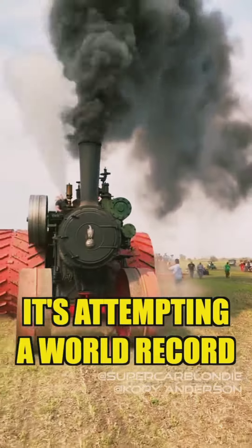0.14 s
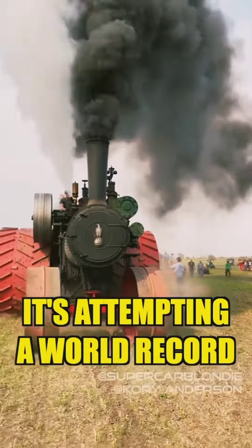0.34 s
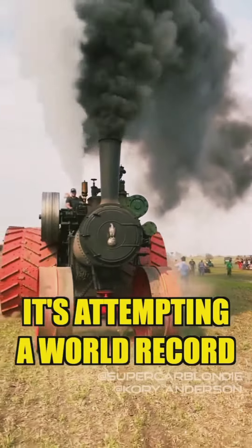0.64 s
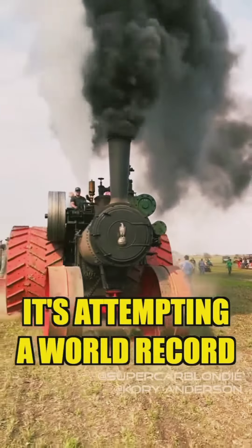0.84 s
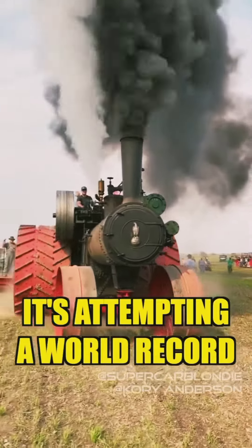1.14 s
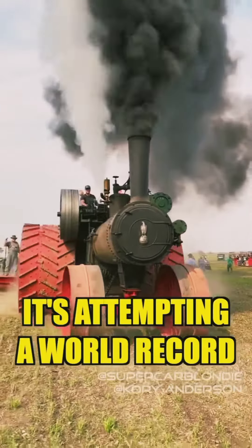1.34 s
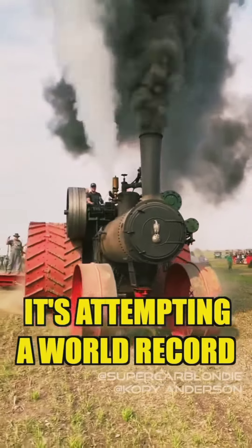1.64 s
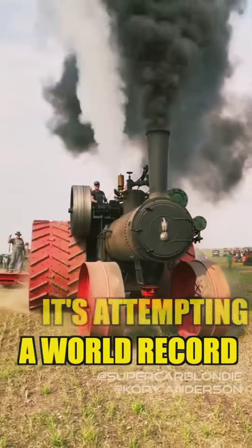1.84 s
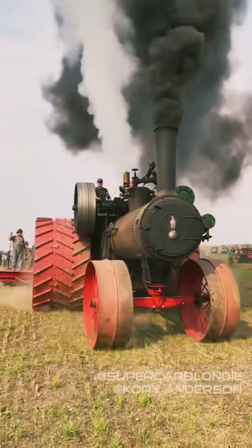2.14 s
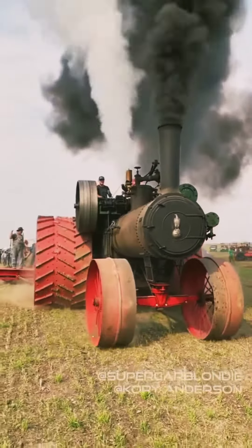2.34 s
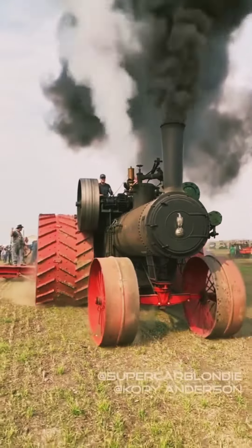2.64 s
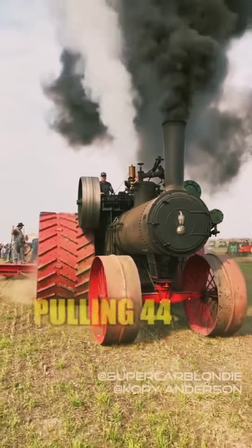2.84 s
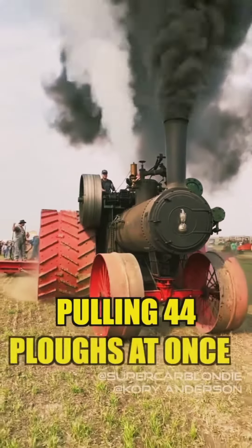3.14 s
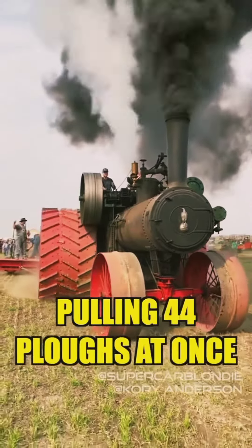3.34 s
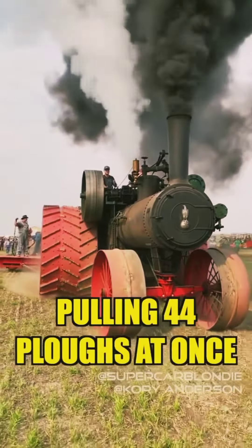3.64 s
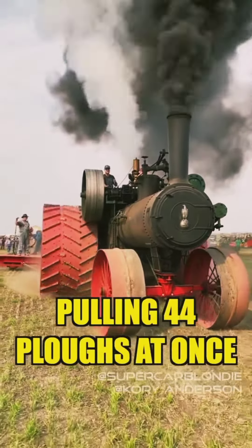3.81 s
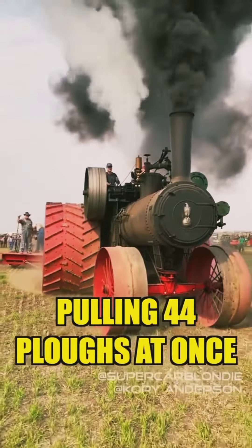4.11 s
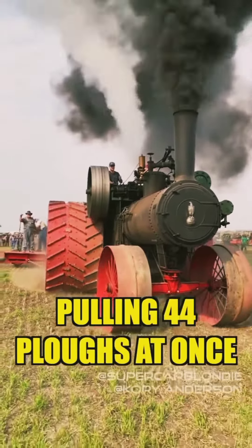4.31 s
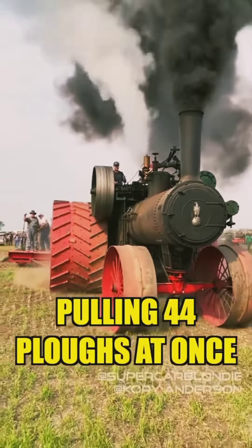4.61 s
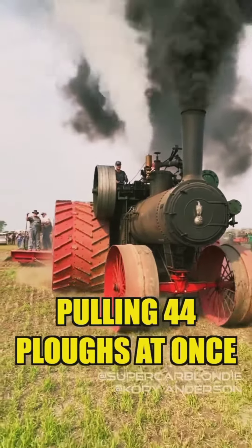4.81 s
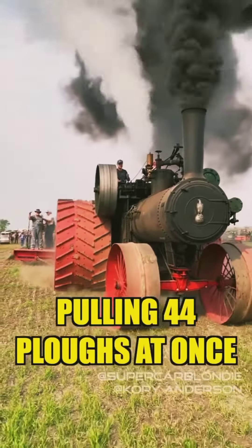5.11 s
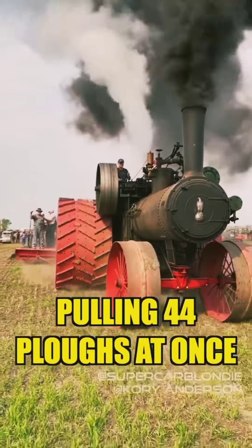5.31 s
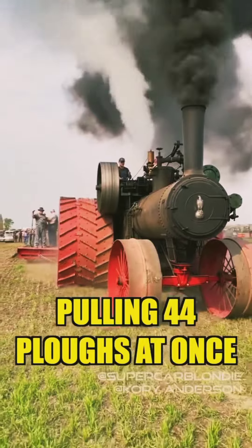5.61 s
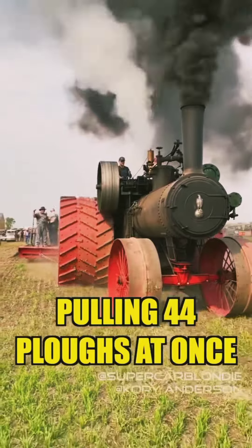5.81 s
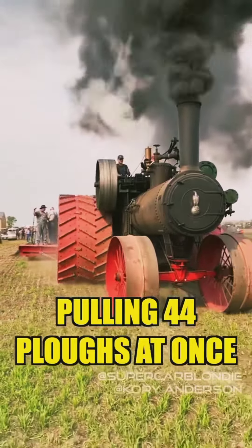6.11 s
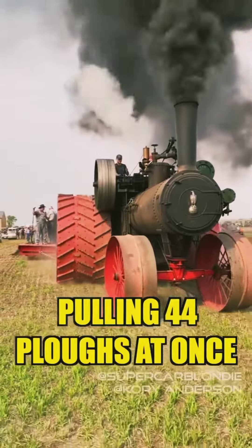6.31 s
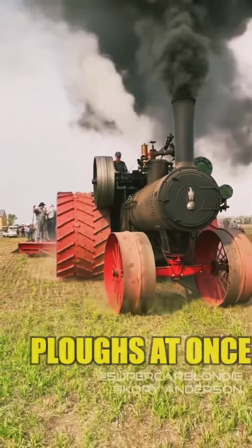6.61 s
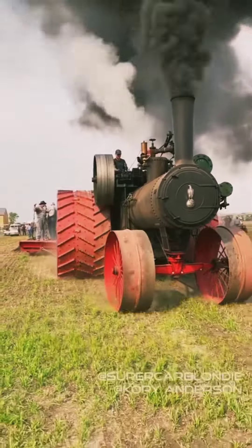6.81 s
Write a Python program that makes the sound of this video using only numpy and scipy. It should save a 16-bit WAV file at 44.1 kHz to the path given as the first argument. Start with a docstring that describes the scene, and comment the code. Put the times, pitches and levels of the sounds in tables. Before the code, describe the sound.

A steam engine's safety valve pops, blows off with a loud roaring hiss, then snaps shut, leaving a thin leak and rapid chuffs.

```python
"""A steam traction engine's safety valve pops and blows off for six seconds.
Its turbulent jet roars and hisses, wet steam sizzles at the seat, and a hollow wavers in the sound.
The valve snaps shut, leaving a thin bright leak. Exhaust puffs boom in the stack about six times
a second, faint under the blow-off, forward before and after. Engine and gusting air rumble below."""
import sys
import numpy as np
from scipy import signal
from scipy.io import wavfile
from scipy.ndimage import map_coordinates

SR = 44100
rng = np.random.default_rng(int(sys.argv[2]) if len(sys.argv) > 2 else 0)


def wav_record(signal):
    """Record a signal, one row per channel, as 16-bit PCM in the file named by sys.argv[1]."""
    frames = np.transpose(np.atleast_2d(signal))
    bounded = np.clip(frames, -1, 1)
    # unit amplitude maps onto the largest positive 16-bit level
    quanta = np.round(bounded * 32767).astype(np.int16)
    wavfile.write(sys.argv[1], SR, quanta)


N = 306495
TIME_S = np.arange(N) / SR

# Steam through the valve. Each row: time in seconds, level in dB over settled flow.
VALVE_FLOW = [(.2, 5.5), (.35, 7.5), (.5, 6), (.93, 6), (1.0, 3.5), (1.15, 3), (1.3, 3.5), (1.7, 2.5),
              (2.05, 0.4), (2.17, -.5), (2.5, -1.1), (2.75, 0), (3.1, 1.6), (3.6, 0.54), (4.05, 0.6),
              (4.45, -1), (4.8, 0.8), (5.45, -1), (5.65, 0), (5.9, 0.5), (6.0, -2.5)]
# Slugs of wet steam. Each row: crest in seconds, decay in seconds, extra level in dB.
STEAM_SPITS = [(0.199, 0.036, 10), (0.396, 0.018, 2.5), (0.411, 0.022, 5), (.527, 0.0088, 3),
               (.595, 0.014, -4.5), (.66, 0.016, 2.5), (0.918, 0.0075, -3), (.958, 0.012, -6),
               (1.95, .03, 3.5), (2.0, 0.14, 2.5)]
# Sizzle during blow-off. Each row: time in seconds, level offset in dB.
SIZZLE_OFFSET = [(.3, -3), (.45, 0), (.7, -0.5), (.76, -9), (.82, -2.5), (.89, -5), (1.0, -2), (6, -2)]
# Reflections off boiler, flywheel and wheels, coming and going as the engine rolls.
# Each row: delay in ms, relative gain, crest in seconds, half length in seconds.
JET_REFLECTIONS = [(1.23, -.13, 2.7, 4), (1.03, -.11, 2.9, 4), (1.93, .17, 2.26, 1), (1.74, .1, 4.35, 4),
                   (2.95, .14, 3.5, 3), (3.15, -.15, 2.5, 2.5)]
LEAK_REFLECTIONS = [(1.24, -.26, 6.6, 1), (1.11, .24, 6.1, 1), (1.93, .42, 6.11, .06),
                    (2.33, -.4, 6.21, .25), (3.06, -.42, 6.35, .35), (3.24, .3, 6.42, .22),
                    (3.72, .27, 6.3, .3), (1.67, -.3, 6.67, .3), (1.98, .36, 6.68, .2),
                    (2.82, -.48, 6.67, .08)]
# Stack air column. Each row: frequency in Hz, width in Hz, bark level in dB, thud level in dB.
STACK_MODES = [(169.7, 10.8, -3, -3), (79.3, 11.8, -18, -21), (136.8, 9.8, -11, -17),
               (230, 14.4, -24, -19.5), (270.6, 24, -9.5, -30), (371, 37, -15.5, -21),
               (422, 24.5, -18, -21), (590, 50, -24, -22)]
# How the exhaust carries. Each row: time in seconds, level in dB.
EXHAUST_LEVEL = [(.07, -3), (.195, -7.5), (.25, -57), (.53, -27.5), (.76, -44), (.88, -44), (2.3, -47),
                 (2.9, -45), (3.8, -48.5), (4.95, -44), (5.5, -55), (6.25, -43.5), (6.55, -47),
                 (6.6, -25.5), (6.66, -25), (6.8, -31.5), (6.95, -29)]
# Governed engine speed. Each row: time in seconds, beats per second.
BEAT_RATE = [(0, 5.82), (2.8, 5.88), (3.6, 5.82), (4.2, 5.97), (7, 6.01)]
# Stirred air. Each row: crest in seconds, half length in seconds, level in dB.
AIR_GUSTS = [(0.11, 0.13, -18), (0.47, 0.073, -22), (0.605, 0.062, -25.5), (0.757, 0.041, -26.5),
             (0.994, 0.19, -46.5), (6.95, 0.05, -51)]
# Moving hollow. Each row: time in seconds, centre in Hz, half width in Hz, nominal depth in dB.
HOLLOW_PATH = [(.21, 630, 199, -2), (.255, 696, 200, 13), (.31, 660, 180, -7.5), (.38, 600, 262, 19),
               (.44, 680, 169, 46), (.57, 710, 158, 45), (.63, 720, 160, 3), (.72, 666, 150, 2),
               (.77, 640, 120, 36), (.87, 660, 252, 50), (.95, 730, 208, 54), (1.02, 670, 214, 50),
               (1.11, 790, 270, 35), (1.22, 760, 235, 18), (1.29, 770, 233, 35), (1.35, 836, 179, 46),
               (1.44, 820, 228, 15), (1.65, 870, 219, 16), (1.78, 880, 160, 55), (1.87, 935, 150, 35),
               (1.93, 980, 119, 44), (2.1, 980, 103, 39), (2.2, 950, 121, 18), (2.4, 940, 130, 5),
               (3.9, 930, 118, 6), (4.04, 1010, 111, 31), (4.17, 930, 125, 3), (5.4, 950, 122, 5.5),
               (5.8, 960, 129, 2)]
# Noise spectra. Each row: frequency in Hz, relative density in dB.
ROAR_SPECTRUM = [(400, -20), (750, -54), (1000, -19), (1150, -6.5), (1300, -4), (1450, 0.5), (2000, 1),
                 (2800, -0.9), (3500, -1.5), (4500, -2.5), (5200, -11.5), (7000, -17), (13000, -62)]
HISS_SPECTRUM = [(1200, -70), (3000, -6), (4600, 0.5), (5250, 1), (6300, 1), (7700, 0.5), (8600, -16),
                 (10500, -62), (13000, -26)]
PLUME_SPECTRUM = [(90, -33), (200, -11.5), (330, -11.5), (450, -7), (560, 0.5), (680, -2.5), (800, 1.5),
                  (1150, 0), (1800, -20)]
SIZZLE_SPECTRUM = [(2500, -62), (6000, -26), (7800, -6.5), (8800, 0), (9800, 0.5), (10500, 1), (11300, 3.5),
                   (11900, 5.5), (12200, 3.5), (13000, -1.5)]
LEAK_SPECTRUM = [(100, -9), (300, -2.5), (600, -3.5), (1000, 3), (1400, 2.5), (2100, 0.5), (2800, 1),
                 (3600, -2), (4500, -1.5), (5500, -2.5), (7500, -1), (9800, 2), (11000, 5.5), (13000, -11)]
POP_SPECTRUM = [(60, -1), (130, -4), (280, 4.5), (400, -16), (700, -6), (1200, -4.5), (2200, -12),
                (5000, -19), (13000, -38)]
BARK_SPECTRUM = [(40, -20), (70, -11), (130, -1.5), (200, 4), (300, -7), (600, -11.5), (1100, -12.5),
                 (2000, -19), (4000, -27), (8000, -36.5), (13000, -41.5)]
PUFF_SPECTRUM = [(60, -18), (170, 7), (290, -23), (380, -6), (470, -2), (600, 5), (1000, -9), (2000, -25),
                 (8000, -39)]
RUMBLE_SPECTRUM = [(15, -36), (35, -13), (55, 1), (80, 4), (125, 0), (200, -8), (320, -18), (600, -14.5),
                   (1500, -61)]
# Stereo width; jet and leak are nearly mono in the lows and at 2-3 kHz, wide in the treble.
# Each row: frequency in Hz, side minus mid in dB.
JET_SPREAD = [(300, -62), (550, -12), (800, -6), (1200, 1.5), (1600, -18.5), (2000, -81), (2500, -58),
              (3400, -19), (4000, -5), (6000, -2), (9000, -2), (12000, -5)]
LEAK_SPREAD = [(400, -35), (950, -25), (1600, -48), (2900, -44), (4200, -3), (7000, -2), (10000, -10.5)]
ENGINE_SPREAD = [(50, -20), (170, -32), (400, -50), (900, -36), (1600, -55), (6000, 0.5)]
RUMBLE_SPREAD = [(40, -10), (120, -15), (300, 4.5), (700, -4), (1500, -16)]

POP_S, OPEN_S, SHUT_S = .183, .198, 6.005
SPIT_SPRAY_SHARE = .68  # share of a spit's dB in hiss and sizzle


def valve_jet(roar_db=-24, hiss_db=-30, plume_db=-36.5, closing_s=.39):
    """The jet hisses at the mouth, roars above, rushes in the plume; more flow is louder and brighter."""
    flow_db, = curves(VALVE_FLOW)
    spit_db = spits_db()
    roar = noise(ROAR_SPECTRUM, JET_SPREAD, flutter_db=.3, flutter_hz=10, flicker_db=4.5, band_hz=131.4)
    roar *= from_db(roar_db + 1.06 * flow_db + spit_db)
    hiss = noise(HISS_SPECTRUM, JET_SPREAD, flutter_db=.6, flutter_hz=20, flicker_db=7.5, band_hz=202.2)
    hiss *= from_db(hiss_db + 1.48 * flow_db + SPIT_SPRAY_SHARE * spit_db)
    closing_db = 3 * step(SHUT_S - closing_s, width_s=.1)  # valve sinks toward its seat
    plume = noise(PLUME_SPECTRUM, JET_SPREAD, flutter_db=.5, flutter_hz=16, flicker_db=3.5)
    plume *= from_db(plume_db + .25 * flow_db + closing_db)
    return valve_lift() * boiler_reflections(roar + hiss + plume, JET_REFLECTIONS)


def valve_lift():
    """The valve jumps open and snaps shut: 0 to 1."""
    return step(OPEN_S, width_s=.007) * (1 - step(SHUT_S, width_s=.022))


def spits_db(attack_s=.004):
    """Slugs of wet steam abruptly choke the valve or burst through it."""
    return sum(db * swell(crest_s, attack_s, decay_s) for crest_s, decay_s, db in STEAM_SPITS)


def valve_seat(simmer_db=-53, blowing_db=-21, seeping_db=-33.5, leak_db=-36.5):
    """Wet steam sizzles at the seat throughout; once shut, leak and sizzle grow as pressure rebuilds."""
    flow_db, = curves(VALVE_FLOW)
    offset_db, = curves(SIZZLE_OFFSET)
    shut, since_shut_s = step(SHUT_S, width_s=.031), TIME_S - SHUT_S
    blowing = valve_lift() * from_db(blowing_db + offset_db + .076 * flow_db
                                     + SPIT_SPRAY_SHARE * spits_db())
    seeping = shut * from_db(seeping_db + 3 * since_shut_s)
    sizzle = noise(SIZZLE_SPECTRUM, JET_SPREAD, flutter_db=.5, flutter_hz=60, flicker_db=7, band_hz=764)
    sizzle *= from_db(simmer_db) + blowing + seeping
    sizzle[1] *= from_db(-8 * shut)  # the small leak is a narrow source
    leak = noise(LEAK_SPECTRUM, LEAK_SPREAD, flutter_db=0, flutter_hz=27, flicker_db=7.5, band_hz=108.8)
    leak *= shut * from_db(leak_db + 5 * since_shut_s)
    return sizzle + boiler_reflections(leak, LEAK_REFLECTIONS)


def valve_pop(level_db=-12):
    """A dull burst as the valve jumps off its seat."""
    burst = noise(POP_SPECTRUM, ENGINE_SPREAD, flutter_db=2, flutter_hz=120, flicker_db=2)
    return from_db(level_db) * swell(POP_S, rise_s=.016, fall_s=.024) * burst


def exhaust(bark_db=-6.5, draught_db=-19, puff_db=-14.5):
    """Puffs ring the stack: a rough bark over the fire's draught, a round thud once the valve pops."""
    popped = step(OPEN_S, width_s=.02)
    boom = stack_boom(popped)
    beats = exhaust_beats()
    bark = noise(BARK_SPECTRUM, ENGINE_SPREAD, flutter_db=1, flutter_hz=22, flicker_db=3)
    bark *= np.hypot(beats * from_db(bark_db), from_db(draught_db))
    puff = noise(PUFF_SPECTRUM, ENGINE_SPREAD, flutter_db=.5, flutter_hz=40, flicker_db=4.5)
    puff *= beats * from_db(puff_db)
    return np.array([boom * beats, np.zeros(N)]) + bark * (1 - popped) + puff * popped


def stack_boom(popped, flutter_db=1.1):
    """Hot, uneven gas makes each air-column resonance wander in pitch and strength."""
    boom = np.zeros(N)
    for hz, width_hz, bark_db, thud_db in STACK_MODES:
        phase = 2 * np.pi * np.cumsum(hz + .5 * width_hz * drift(25.7)) / SR
        level_db = bark_db * (1 - popped) + thud_db * popped + flutter_db * drift(32)
        boom += np.sqrt(2) * np.sin(phase) * from_db(level_db)
    return boom


def exhaust_beats(first_s=.024, scatter_s=.0018, scatter_db=1.3, echo_s=.057, echo_db=-9):
    """Envelope of the cylinder releases, at even steps of the crank, each with one echo."""
    rate_hz, = curves(BEAT_RATE)
    carry_db, = curves(EXHAUST_LEVEL)
    strokes = np.cumsum(rate_hz) / SR
    beats = np.zeros(N)
    for beat_s in first_s + np.interp(np.arange(strokes[-1]), strokes, TIME_S):
        late_s, extra_db = rng.normal(0, [scatter_s, scatter_db])
        beats += from_db(extra_db) * swell(beat_s + late_s, rise_s=.026, fall_s=.028)
    echo = from_db(echo_db) * np.interp(TIME_S - echo_s, TIME_S, beats, left=0)
    return from_db(carry_db) * np.hypot(beats, echo)


def rumble(calm_db=-62, stirred_db=23.5, settle_s=1.88, buffet_db=2.5):
    """Lumpy low noise of engine and air settles; gusts also buffet each side on its own."""
    gusts = sum(from_db(db) * swell(crest_s, half_s, half_s) for crest_s, half_s, db in AIR_GUSTS)
    air = from_db(calm_db + stirred_db * np.exp(-TIME_S / settle_s))
    lumps = noise(RUMBLE_SPECTRUM, RUMBLE_SPREAD, flutter_db=3.5, flutter_hz=16, flicker_db=0)
    return lumps * np.array([np.hypot(air, gusts), from_db(buffet_db) * gusts])


def boiler_reflections(sound, reflections, above_hz=1450):
    """Short, shifting reflections comb the treble; longer waves bend around the engine."""
    treble = signal.sosfiltfilt(signal.butter(2, above_hz, "high", fs=SR, output="sos"), sound)
    combed, power = treble.copy(), 1
    for delay_ms, gain, crest_s, half_s in reflections:
        share = gain * swell(crest_s, half_s, half_s)
        delayed = [np.interp(TIME_S - delay_ms / 1000, TIME_S, channel) for channel in treble]
        combed += share * np.array(delayed)
        power += share ** 2
    return sound - treble + combed / np.sqrt(power)


def hollow(mid, centre_waver=.05, depth_waver=.19):
    """A steep-sided spectral hollow wavers, climbs and narrows, like a slow phasing sweep."""
    centre_hz, half_hz, depth_db = curves(HOLLOW_PATH)
    centre_hz *= 1 + centre_waver * drift(14)
    depth_db *= np.exp(depth_waver * drift(8))
    hz, frame_s, bands = signal.stft(mid, SR, nperseg=2048, noverlap=1792)
    centre_hz, half_hz, depth_db = [np.interp(frame_s, TIME_S, c) for c in (centre_hz, half_hz, depth_db)]
    inside = 1 / (1 + ((hz[:, None] - centre_hz) / half_hz) ** 12)
    return signal.istft(bands * from_db(-depth_db * inside), SR, noverlap=1792)[1][:N]


def noise(spectrum, spread, flutter_db, flutter_hz, flicker_db, band_hz=325, flicker_per_s=34):
    """Noise, mid (rms 1) and side: the overall level flutters, single bands flicker and briefly drop."""
    hz, frame_s, bands = signal.stft(rng.standard_normal((2, N)), SR, nperseg=1024)
    mid_db = band_levels_db(spectrum, hz)
    side_db = mid_db + band_levels_db(spread, hz)
    grid = np.array(np.meshgrid(hz / band_hz, frame_s * flicker_per_s, indexing="ij"))
    flicker = map_coordinates(rng.standard_normal((128, 512)), grid, order=1, mode="wrap")
    flicker = np.minimum(flicker, .5 * flicker)  # a band sags further than it swells
    bands *= from_db(np.array([mid_db, side_db])[:, :, None] + flicker_db * flicker)
    shaped = signal.istft(bands, SR)[1][:, :N] * from_db(flutter_db * drift(flutter_hz))
    return shaped / np.std(shaped[0])


def drift(rate_hz, hop=40, warmup=2000):
    """Slow random wander, rms 1."""
    pole = np.exp(-2 * np.pi * rate_hz * hop / SR)
    white = rng.standard_normal(N // hop + warmup + 2)
    slow = signal.lfilter([1], [1, -2 * pole, pole ** 2], white)[warmup:]
    slow /= np.sqrt(np.mean(slow ** 2))
    return np.interp(np.arange(N) / hop, np.arange(len(slow)), slow)


def swell(crest_s, rise_s, fall_s):
    """Smooth hump of height 1."""
    age_s = TIME_S - crest_s
    width_s = np.where(age_s < 0, rise_s, fall_s)
    return np.exp(-np.minimum((age_s / width_s) ** 2, 60))


def step(at_s, width_s):
    """Smooth rise from 0 to 1."""
    return .5 + .5 * np.tanh((TIME_S - at_s) / width_s)


def curves(rows):
    """Each value column of a time table, per sample."""
    times_s, *columns = np.transpose(rows)
    return [np.interp(TIME_S, times_s, column) for column in columns]


def band_levels_db(rows, hz):
    """A frequency table interpolated on a log axis."""
    points_hz, points_db = np.transpose(rows)
    return np.interp(np.log(hz + 1), np.log(points_hz), points_db)


def from_db(db):
    """Decibels to gain."""
    return 10 ** (db / 20)


def scene():
    """All sources, from mid and side to left and right."""
    mid, side = exhaust() + rumble() + valve_pop() + valve_jet() + valve_seat()
    mid = hollow(mid)
    return np.array([mid + side, mid - side])


def record(dry):
    """Narrow treble notch, overload on the loudest peaks, steep top cut."""
    notch_hz, width_hz, depth, cutoff_hz = 4920, 280, .95, 13080
    notched = signal.lfilter(*signal.iirnotch(notch_hz, notch_hz / width_hz, SR), dry)
    clipped = np.clip(dry + depth * (notched - dry), -.95, .95)
    return signal.sosfilt(signal.ellip(14, .1, 80, cutoff_hz, fs=SR, output="sos"), clipped)


dry = scene()
out = record(dry)
wav_record(out)
```